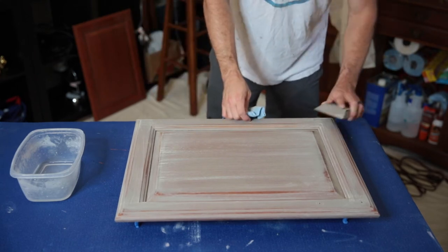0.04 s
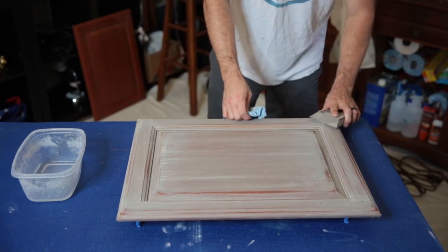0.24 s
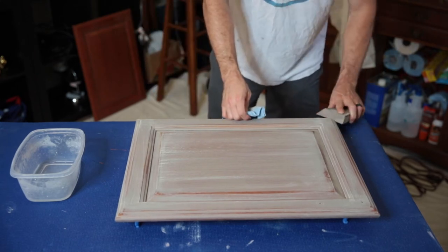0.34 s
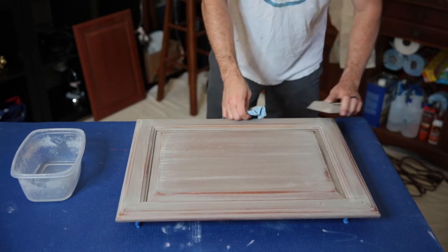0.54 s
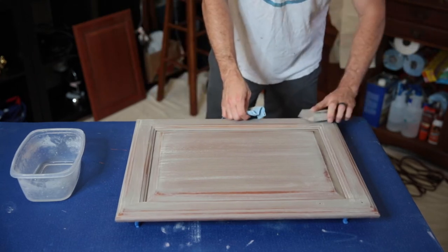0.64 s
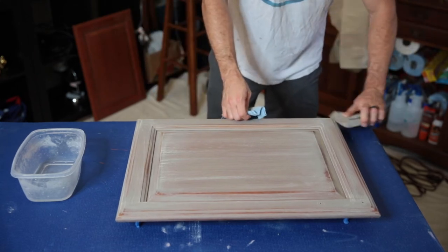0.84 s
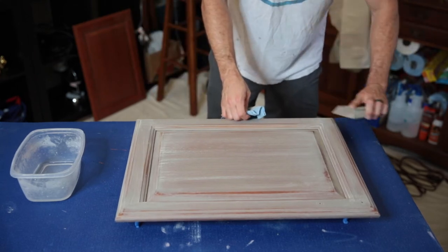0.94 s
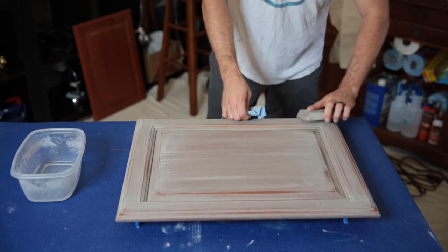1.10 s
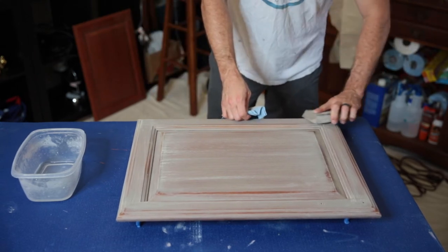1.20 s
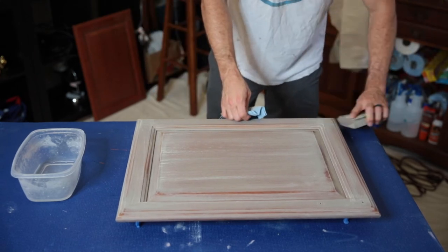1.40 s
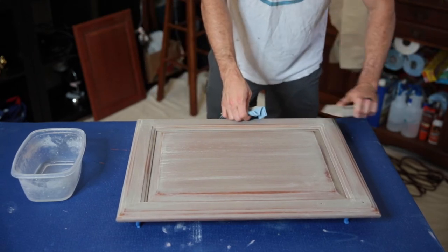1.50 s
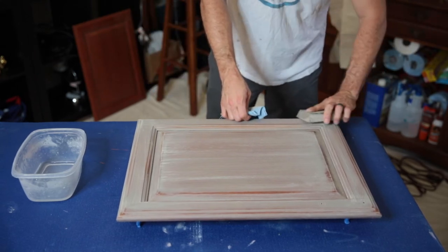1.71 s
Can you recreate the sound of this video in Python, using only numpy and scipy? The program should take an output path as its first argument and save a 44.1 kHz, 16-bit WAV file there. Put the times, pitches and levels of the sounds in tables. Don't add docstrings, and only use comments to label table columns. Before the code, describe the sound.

Sanding of a painted wooden door edge: the tail of an earlier stroke rings faintly at the start, then gritty swishes come at about 0.23-0.49, 0.72-1.04 and 1.21-1.55 seconds. The first is loudest. Hollow panel bumps run from 0.2 onward, strong near 0.8; bright scratches fall near 0.94 and 1.19, a faint scuff at 1.72. Close microphone, live room, soft hiss, faint hum.

```python
import sys
import numpy as np
from scipy import signal
from scipy.fft import rfft, irfft
from scipy.io import wavfile
from scipy.ndimage import uniform_filter1d

SR = 44100
rng = np.random.default_rng(int(sys.argv[2]) if len(sys.argv) > 2 else 0)


def int16_out(signal):
    q = np.round(np.clip(np.atleast_2d(signal).T, -1, 1) * 32767)
    wavfile.write(sys.argv[1], SR, q.astype(np.int16))


def natural_amplitude(level_db):
    exponent = np.asarray(level_db, float) / 20
    return 10 ** exponent


N = 77175
LEAD_S = 0.4

# f/Hz, density/dB
HISS_SPECTRUM = [(30, -11), (90, -11), (130, -6), (260, -0.5), (500, -4), (1200, -9), (2500, -12.5),
                 (15700, -29.5)]
HISS_DB, HUM_HZ, HUM_DB = -52, 61, -61.5

# t/s, speed-up/s, slow-down/s, level/dB, lag of the treble peak/s
STROKES = [
    (-.3, 0.17, 0.13, -33, 0.046),
    (0.226, 0.11, 0.15, -28.5, 0.015),
    (0.721, 0.072, 0.25, -32.5, 0.019),
    (1.214, 0.094, 0.24, -33, 0.057),
]
SPEED_UP_BEND, SLOW_DOWN_BEND = 0.57, 0.85

# f/Hz, density/dB
GRIT_SPECTRUM = [(500, -15.5), (940, -21.5), (1250, -16), (2400, -15.5), (4500, -17), (8000, -20.5),
                 (12000, -26.5), (15700, -32)]
# f/Hz, width/Hz, level/dB
RAIL_MODES = [(1250, 200, -10), (2120, 100, -8), (2370, 220, -6), (3200, 250, -12)]
GRAINS_PER_S, GRAIN_SPREAD_DB, CHATTER_DB = 30000, 1.5, 0.7
DULL_POWER, BRIGHT_POWER, SPLIT_HZ = 1.35, 3.13, 3100
DUST_HZ, DUST_POWER, DUST_DB = 10500, 2.3, -13.5

# f/Hz, decay/s
ROOM_DECAY = [(150, 0.36), (500, 0.67), (1700, 0.8), (4600, 0.61), (8000, 0.52), (13000, 0.35)]
BRIGHT_WET_DB, PANEL_WET_DB = -4, -8

# t/s, level/dB, low boom mode/dB, main mode/dB, length of push/s
DOOR_BUMPS = [(.2115, -36, -4, 2.5, 0.012), (.29, -37, -2, 5.5, 0.019), (.312, -37, 1, 1.5, 0.0077),
              (.348, -48, -13, 8, 0.028), (.42, -42.5, -4, -1, 0.017), (.455, -45.5, 4.5, 3.5, 0.0086),
              (.505, -46, -10, -1, 0.022), (.602, -41.5, -1, -1, 0.013), (.698, -47, -2, -3, 0.011),
              (.74, -39.5, -8, 4, 0.0093), (.8, -33.5, -1, 6, .024), (.885, -44, -4, -2, 0.0092),
              (.93, -42, -2, 4, 0.026), (.968, -38, 2, 0.5, 0.019), (1.005, -42, 1.5, -7.5, 0.0086),
              (1.064, -42.5, -12, 1, 0.015), (1.192, -45.5, 7, 1, 0.028), (1.222, -44.5, 7, -4, 0.013),
              (1.268, -39, -6, 4, 0.013), (1.292, -37, 5, -6.5, 0.019), (1.348, -42, -9, -2, 0.029),
              (1.434, -39, -5.5, -2, 0.0078), (1.54, -40.5, -9, -4, 0.026), (1.728, -51.5, 5, -5, 0.026)]
# f/Hz, width/Hz, level/dB
PANEL_MODES = [(112, 53, -12), (226.8, 9.3, -7.5), (277.4, 21.4, -7.5), (312.8, 15.5, -8), (359, 32, -16),
               (395, 64, -7.5), (499, 14.6, -8.5), (566.4, 16, -8.5), (649, 16, -10.5), (760, 63, -15.5)]
BOOM, MAIN = (147.4, 12.4), (440, 9)
DETUNE, WANDER_RAD = 0.004, 0.5
UNEVEN_DB, KNOCK_DB = 3, -11
FIRST_CONTACT, CONTACT_S = 1.5, 0.002
RUB_INTO_PANEL_DB = -4

# t/s, level/dB, f/Hz, width/Hz, length/s
PAINT_TICKS = [(.212, -55, 6960, 1500, 0.014), (0.2127, -38.5, 1310, 1620, .003),
               (0.213, -46.5, 4380, 5000, 0.025), (0.694, -44.5, 3000, 5000, .002),
               (1.193, -43, 1800, 1490, .002), (1.226, -47, 3000, 1950, 0.0058),
               (1.451, -39, 1750, 2000, 0.008), (1.068, -44, 1650, 1500, .01),
               (1.719, -46, 4930, 1200, 0.0026), (1.72, -46, 3250, 1500, 0.0067),
               (1.721, -47, 1300, 1220, 0.0052)]
# t/s, level/dB, f/Hz, width/Hz, length/s
SHARP_SCRATCHES = [
    (.939, -38, 5300, 900, .008),
    (1.1915, -40, 4850, 700, .0025),
]

BAND_LIMIT_HZ = 15790


def evened(x):
    return x / np.sqrt(np.mean(x ** 2) + 1e-20)


def read(points, hz):
    f, value = np.transpose(points)
    return np.interp(np.log(hz + 1), np.log(f + 1), value)


def colour(x, gain):
    return irfft(rfft(x) * gain(np.fft.rfftfreq(len(x), 1 / SR)), len(x))


def ring(x, hz, width):
    r = np.exp(-np.pi * width / SR)
    return 2 * signal.lfilter([1 - r], [1, -r * np.exp(2j * np.pi * hz / SR)], x).real


def air(t):
    hiss = evened(colour(rng.standard_normal(len(t)), lambda f: natural_amplitude(read(HISS_SPECTRUM, f))))
    hum = np.sqrt(2) * np.sin(2 * np.pi * HUM_HZ * t)
    return natural_amplitude(HISS_DB) * hiss + natural_amplitude(HUM_DB) * hum


def room(x):
    taps = np.zeros(SR)
    at = np.arange(300, SR - 20, 20)
    taps[at + rng.integers(0, 20, len(at))] = rng.choice([-1., 1.], len(at))
    hz, t, bands = signal.stft(taps, SR, nperseg=256)
    decay = natural_amplitude(-60 * t / read(ROOM_DECAY, hz)[:, None])
    tail = signal.istft(bands * decay, SR, nperseg=256)[1]
    return signal.fftconvolve(x, tail / np.linalg.norm(tail))[:len(x)]


def hand_speed(t, start, up, down):
    rising = np.clip((t - start) / up, 0, 1) ** SPEED_UP_BEND
    falling = np.clip((t - start - up) / down, 0, 1) ** SLOW_DOWN_BEND
    return np.sin(np.pi / 2 * rising) * np.cos(np.pi / 2 * falling).clip(0)


def sanding(t):
    n = len(t)
    grit = natural_amplitude(GRAIN_SPREAD_DB * rng.exponential(1, n)) * rng.standard_normal(n)
    grit = grit * (rng.random(n) < GRAINS_PER_S / SR)
    chatter = evened(uniform_filter1d(rng.standard_normal(n), size=500))
    grit = grit * natural_amplitude(CHATTER_DB * chatter)
    grit = colour(grit, lambda f: natural_amplitude(read(GRIT_SPECTRUM, f)) / (1 + (450 / (f + 1)) ** 4))
    rail = sum(natural_amplitude(db) * ring(grit, hz, width) for hz, width, db in RAIL_MODES)
    grit = evened(grit + rail)
    dull = colour(grit, lambda f: 1 / (1 + (f / SPLIT_HZ) ** 2))
    bright = grit - dull
    out = np.zeros(n)
    for start, up, down, db, lag in STROKES:
        dull_swell = hand_speed(t, start, up, down) ** DULL_POWER
        bright_swell = hand_speed(t, start, up + lag, down - lag / 2) ** BRIGHT_POWER
        out = out + natural_amplitude(db) * (dull_swell * dull + bright_swell * bright)
    return out


def dust_fizz(t):
    dust = evened(colour(rng.standard_normal(len(t)), lambda f: 1 / (1 + (DUST_HZ / (f + 1)) ** 6)))
    return sum(natural_amplitude(db + DUST_DB) * hand_speed(t, start, up + lag, down) ** DUST_POWER * dust
               for start, up, down, db, lag in STROKES)


def bump(db, boom_db, main_db, length, chance, shake):
    t = np.arange(len(shake)) / SR
    push = shake * np.sin(np.pi * np.minimum(t / (2 * length), 1))
    push = push + FIRST_CONTACT * np.sin(np.pi * np.minimum(t / CONTACT_S, 1)) ** 2
    out = natural_amplitude(KNOCK_DB) * evened(ring(ring(push, 300, 500), 530, 990))
    rise = np.sin(np.pi / 2 * np.minimum(t / length, 1)) ** 2
    wander = WANDER_RAD * evened(uniform_filter1d(uniform_filter1d(shake, size=700), size=700))
    for k, (hz, width, mode_db) in enumerate([(*BOOM, boom_db), (*MAIN, main_db)]):
        tone = np.sin(2 * np.pi * hz * (1 + DETUNE * chance[-k - 1]) * t + wander)
        decay = np.exp(-np.pi * width * np.maximum(t - length, 0))
        out = out + natural_amplitude(mode_db) * evened(tone * rise * decay)
    for k, (hz, width, mode_db) in enumerate(PANEL_MODES):
        mode = evened(ring(ring(push, hz, width), hz, 4 * width))
        out = out + natural_amplitude(mode_db + UNEVEN_DB * chance[k]) * mode
    return natural_amplitude(db - 8.5) * out


def door(t, rub):
    bumps = np.zeros(len(t) + SR)
    chance = rng.standard_normal((len(DOOR_BUMPS), 24))
    shake = rng.standard_normal((len(DOOR_BUMPS), SR // 5))
    for k, (s, *row) in enumerate(DOOR_BUMPS):
        at = round((s - t[0]) * SR)
        bumps[at:at + shake.shape[1]] += bump(*row, chance[k], shake[k])
    rub_loudness = uniform_filter1d(abs(rub), size=800)
    rubbing = natural_amplitude(RUB_INTO_PANEL_DB) * rub_loudness * rng.standard_normal(len(t))
    modes = [*PANEL_MODES, (*BOOM, -3), (*MAIN, -2)]
    drone = sum(natural_amplitude(db) * ring(rubbing, hz, width) for hz, width, db in modes)
    return colour(bumps[:len(t)] + drone,
                  lambda f: 1 / (1 + (85 / (f + 1)) ** 4) / (1 + (f / 2500) ** 4))


def touch(t, start, length):
    u = np.clip((t - start) / length, 0, 9)
    return np.minimum(u * 8, 1) * np.exp(-u ** 2) * (u < 9)


def scuffs(t):
    noise, out = rng.standard_normal(len(t)), np.zeros(len(t))
    for s, db, hz, width, length in [*PAINT_TICKS, *SHARP_SCRATCHES]:
        shape = touch(t, s, length)
        band = evened(ring(ring(noise, hz, width), hz, width))
        scuff = shape * (band + 0.04 * noise)
        out = out + natural_amplitude(db) * scuff * np.linalg.norm(shape) / np.linalg.norm(scuff)
    return out


def scene():
    lead = round(LEAD_S * SR)
    t = (np.arange(N + lead) - lead) / SR
    rub = sanding(t)
    bright = rub + scuffs(t)
    boom = door(t, rub)
    echoes = room(natural_amplitude(BRIGHT_WET_DB) * bright + natural_amplitude(PANEL_WET_DB) * boom)
    mix = air(t) + echoes + bright + dust_fizz(t) + boom
    return np.tile(mix[lead:], (2, 1))


def low_pass(x):
    return signal.sosfilt(signal.butter(12, 15820, fs=SR, output="sos"), x)


def record(dry):
    lowpass = signal.firwin(801, BAND_LIMIT_HZ, window=("kaiser", 10), fs=SR)
    mix = signal.oaconvolve(dry, lowpass[None], "same")
    return low_pass(mix)


dry = scene()
out = record(dry)
int16_out(out)
```